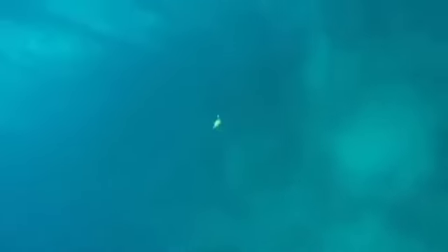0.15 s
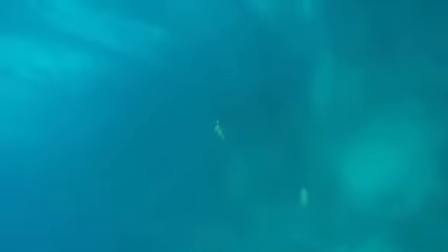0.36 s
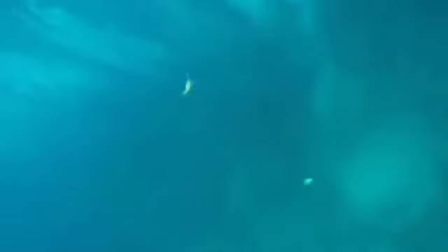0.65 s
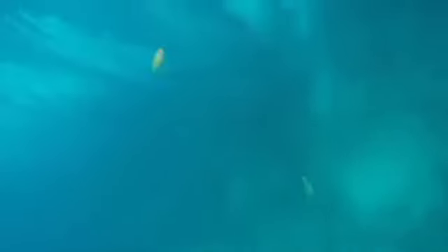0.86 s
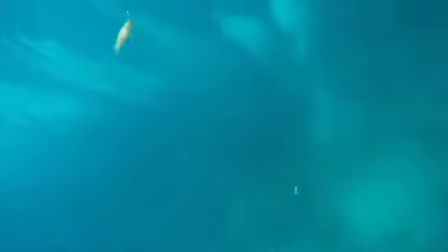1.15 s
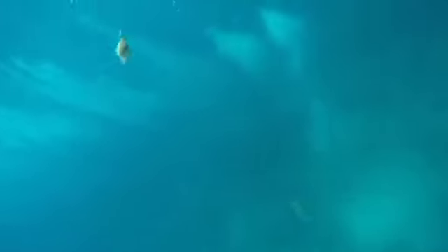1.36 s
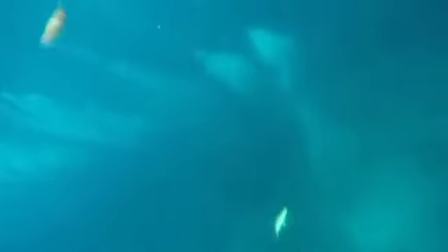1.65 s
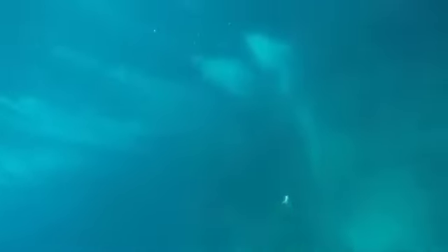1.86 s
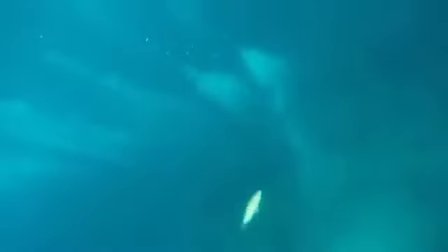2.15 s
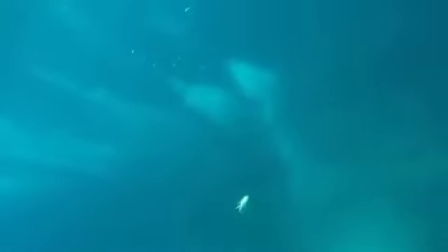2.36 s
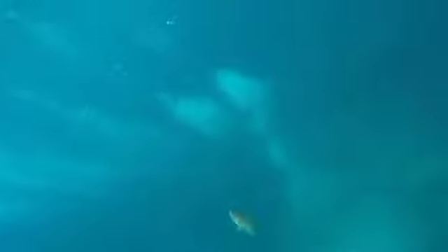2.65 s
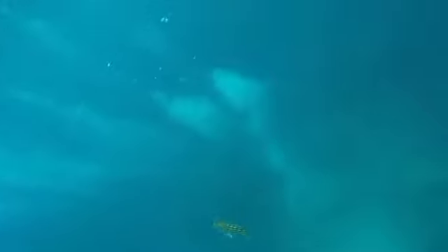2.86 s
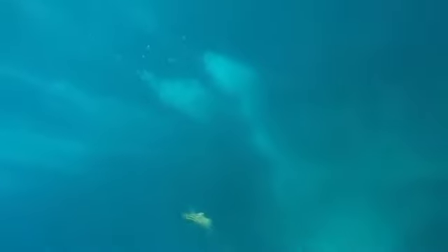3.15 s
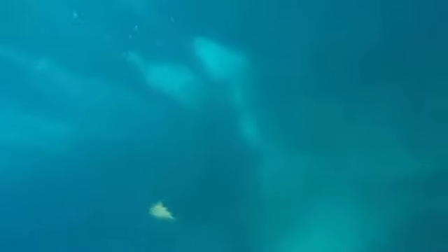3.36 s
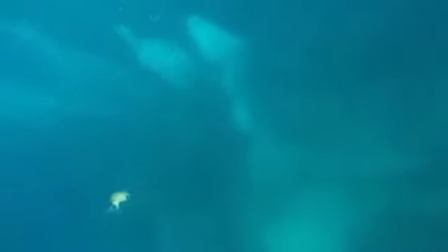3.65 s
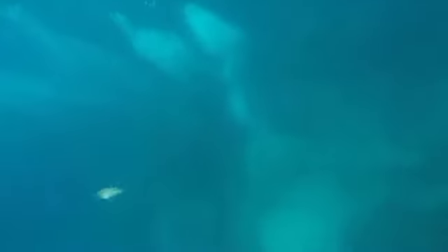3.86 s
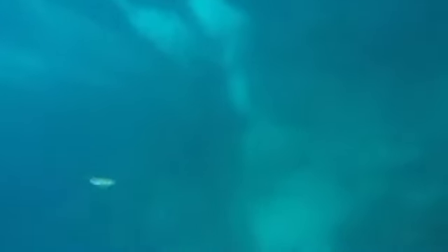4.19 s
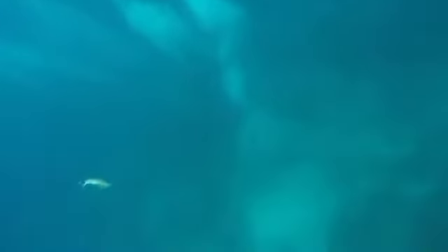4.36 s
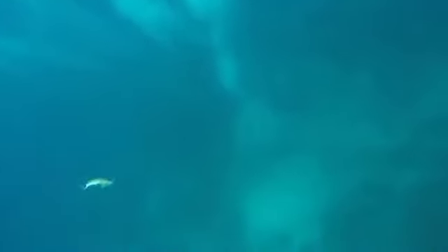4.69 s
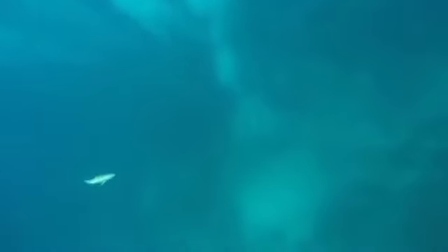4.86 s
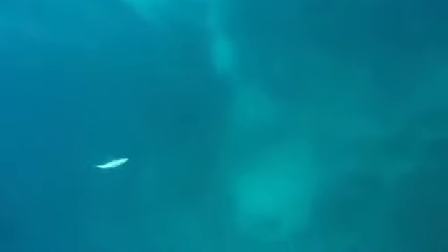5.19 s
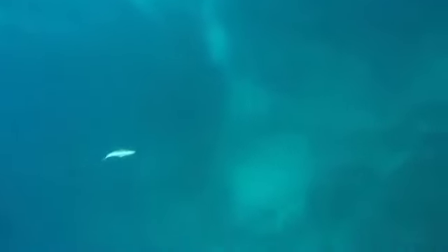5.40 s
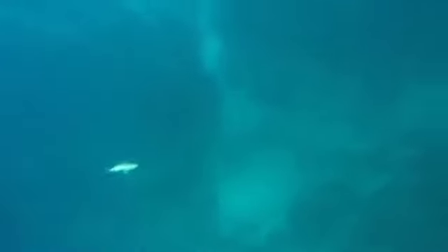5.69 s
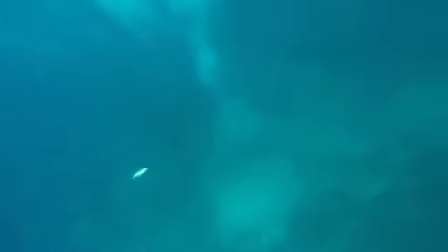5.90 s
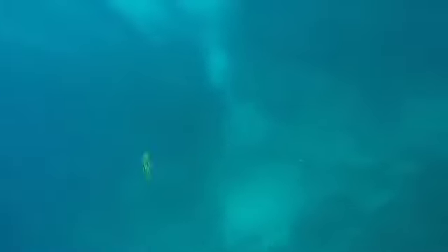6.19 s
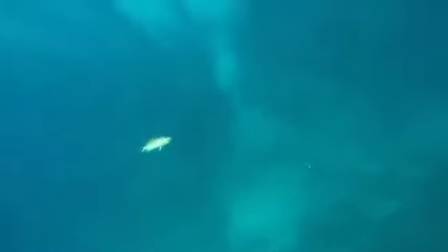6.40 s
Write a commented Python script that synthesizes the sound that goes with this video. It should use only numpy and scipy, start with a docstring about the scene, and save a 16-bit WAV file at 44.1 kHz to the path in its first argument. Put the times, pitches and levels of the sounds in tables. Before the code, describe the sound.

A slow boat engine idles, heard underwater. Each firing is a hollow, ringing knock through the hull, followed by a quick metallic clatter, about six or seven times a second. In the second half it slows and sounds heavier, stumbling once near the end. Water rumbles low against the microphone throughout, with a bubble blip early on and faint snapping of shrimp all around.

```python
"""Boat engine under water

A slow single-cylinder engine idles, then sags towards the end. Each firing booms through
the hull, and the valve gear clacks at fixed points of the cycle. Water rumbles against
the camera housing, a few bubbles ring, and shrimp snap all around."""
import sys
import numpy as np
from scipy import signal
from scipy.fft import rfft, irfft
from scipy.io import wavfile
from scipy.ndimage import uniform_filter1d

SR = 44100
rng = np.random.default_rng(int(sys.argv[2]) if len(sys.argv) > 2 else 0)


def unload_wav(signal):
    """Save mono or channel-first audio to the path in sys.argv[1] as 16-bit WAV at rate SR, clipped to [-1, 1]."""
    wavfile.write(
        sys.argv[1],
        SR,
        np.round(np.clip(np.atleast_2d(signal).T, -1, 1) * 32767).astype(np.int16),
    )


N = 288414


def amp(db):
    """Turns decibels into a number to multiply by."""
    return 10 ** (np.asarray(db) / 20)


def unit_level(x):
    """Scales a sound to an average power of 1."""
    return x / np.sqrt(np.mean(x ** 2) + 1e-20)


def at_time(curve, s):
    """Reads a curve at s seconds."""
    return np.interp(s, *np.transpose(curve))


def at_hz(points, hz):
    """Reads a spectrum between its points, with octaves evenly spaced."""
    point_hz, db = np.transpose(points)
    return np.interp(np.log(hz + 1), np.log(point_hz + 1), db)


def add(mix, s, sound):
    """Mixes a sound in at s seconds."""
    start = round(s * SR)
    sound = sound[max(-start, 0):]
    part = mix[max(start, 0):][:len(sound)]
    part += sound[:len(part)]


def filter_hz(size=8192):
    """The frequencies at which filters are drawn."""
    return np.fft.rfftfreq(size, 1 / SR)


def peaks_db(rows, hz):
    """Adds up peaks and dips into one curve in dB."""
    return sum(db / (1 + (2 * (hz - centre) / width) ** 2) for centre, width, db in rows)


def make_filter(db):
    """A filter with these gains that rings only after a blow, never before."""
    log_gain = np.log(amp(np.r_[db, db[-2:0:-1]]))
    spectrum = np.exp(np.conj(signal.hilbert(log_gain)))
    return np.fft.ifft(spectrum).real[:len(db)]


def ring(hz, swell_s, order=1):
    """A tone that swells to height 1 and dies away; a higher order makes it shorter."""
    t = np.arange(SR // 4) / SR
    envelope = (t / swell_s * np.exp(1 - t / swell_s)) ** order
    return envelope * np.sin(2 * np.pi * hz * t)


def rattle(decay_s):
    """A dying burst of tiny contacts, about equally strong at all frequencies."""
    t = np.arange(SR // 10) / SR
    spectrum = rfft(rng.standard_normal(len(t)) * np.exp(-t / decay_s))
    flat_burst = irfft(spectrum / abs(spectrum))
    return flat_burst * np.exp(-t / (10 * decay_s)) * np.sqrt(decay_s * SR / 2)


def noise(points):
    """Steady noise with the given spectrum."""
    gain = amp(at_hz(points, filter_hz(N)))
    return unit_level(irfft(rfft(rng.standard_normal(N)) * gain, N))


# The deep tone of swirling water. Each row: frequency in Hz, relative level in dB.
RUMBLE_SPECTRUM = [(8, -16.5), (18, 4), (32, 5.5), (48, -1), (65, -1.5), (88, -9), (120, -11), (160, -18),
                   (185, -23.5), (280, -22), (420, -24), (800, -30.5), (2000, -65.5)]
# The water's slow push on the housing. Each row: time in seconds, relative level in dB.
WATER_SWELL = [(0, -17.5), (.6, -15.5), (.95, -19.5), (1.45, -16), (1.85, -19), (2.35, -16), (3.2, -19.5),
               (3.65, -18), (5.15, -18.5), (6, -17), (6.5, -14)]

def water(db=-1.0):
    """Swirls of water press on the housing and make a rumble that slowly rises and falls."""
    eddies = noise(RUMBLE_SPECTRUM)
    eddies /= np.sqrt(uniform_filter1d(eddies ** 2, size=7000))  # even out chance swells
    swell_db = at_time(WATER_SWELL, np.arange(N) / SR)
    return amp(db + swell_db) * unit_level(eddies)


# Bubbles near the housing. Each row: start in seconds, pitch in Hz, level in dB, swell in seconds.
NEAR_BUBBLES = [(.827, 572, -9.5, 0.01), (3.922, 275, -23, .014), (5.207, 3700, -21, 0.00063)]

def bubbles():
    """Each bubble rings briefly at its own pitch."""
    out = np.zeros(N)
    for s, hz, db, swell_s in NEAR_BUBBLES:
        add(out, s, amp(db) * ring(hz, swell_s))
    return out


# The tone of a snap. Each row: frequency in Hz, gain in dB.
SNAP_SPECTRUM = [(500, -48), (1800, -34), (2600, 8.5), (4200, 4.5), (5500, 1.5), (8000, 1), (9500, -4),
                 (15000, -11.5)]

def snap(tilt_db, decay_s=0.0017):
    """A click smeared for a moment by the housing; a lower tilt makes it duller."""
    hz = filter_hz()
    treble_db = at_hz([(5500, 0), (11000, tilt_db + 8.0)], hz)
    tone = make_filter(at_hz(SNAP_SPECTRUM, hz) + treble_db)
    return signal.fftconvolve(rattle(decay_s), tone)[:SR // 20]


# The fizz of far shrimp. Each row: frequency in Hz, relative level in dB.
FIZZ_SPECTRUM = [(2000, -15), (4300, -4.5), (6500, 2.5), (8300, 1.5), (9500, -15), (11200, 2.5),
                 (13000, -15), (15500, -11.5)]
# Shrimp close by. Each row: start in seconds, relative level in dB, relative treble tilt in dB.
NEAR_SNAPS = [(0.1504, -27.5, -18), (0.7294, -25, -25), (0.8635, -29, -23), (0.885, -30, -16),
              (0.9694, -27.5, -36), (1.256, -26, -22), (3.528, -30, -19), (4.181, -29, -10),
              (4.3663, -31, -8), (5.2, -31, -14), (5.6176, -26.5, -17), (5.9243, -30.5, -7),
              (6.088, -30.5, -11), (6.3214, -31, -16), (6.3362, -29, -12)]

def shrimp(near_db=3, crowd_db=-55, snaps_per_s=230, spread_db=5.0, fizz_db=-61):
    """Shrimp make a far fizz, a few near snaps and a crowd of small ones at random times."""
    out = amp(fizz_db) * noise(FIZZ_SPECTRUM)
    for s, db, tilt_db in NEAR_SNAPS:
        add(out, s, amp(db + near_db) * snap(tilt_db))
    tilts = np.linspace(-14, 2, 20)
    for tilt_db in tilts:
        sizes = amp(crowd_db + spread_db * np.minimum(rng.exponential(1, N), 4))
        snapping = rng.random(N) < snaps_per_s / len(tilts) / SR
        out += signal.oaconvolve(sizes * snapping, snap(tilt_db))[:N]
    return out


# The way through hull and water. Each row: frequency in Hz, relative gain in dB.
WATER_PATH = [(60, -16.5), (200, -14.5), (400, -13.5), (690, -5.5), (820, -17.5), (1000, -19.5),
              (1700, -26.5), (2600, -22), (3500, -30), (4250, -31), (4700, -48), (8000, -56), (15000, -72)]
# The hull's peaks and dips. Each row: centre in Hz, width in Hz, gain in dB.
HULL_PEAKS = [(450, 160, 8.5), (497, 4.4, 3), (617, 129.5, 13.5), (1147, 16, 10), (1547, 100, 6.5),
              (1752, 63, 10), (1867, 160, -7.5), (2045, 107, 13), (2183, 163, 12.5), (3400, 57, 3),
              (3412, 82, 8)]
# Four frequencies in Hz that set a blow's tone: low, middle, one held at 0 dB, high.
TONE_HZ = (600, 1300, 2150, 3600)

def through_hull(force, low_db, mid_db, high_db):
    """A force takes its tone from the spot it strikes and from the ringing of the hull."""
    hz = filter_hz()
    hull_db = at_hz(WATER_PATH, hz) + peaks_db(HULL_PEAKS, hz)
    hull_db -= 10 * np.log10(np.mean(amp(hull_db) ** 2))  # change the tone, keep the power
    contact_db = at_hz(list(zip(TONE_HZ, (low_db, mid_db, 0, high_db))), hz)
    return signal.oaconvolve(force, make_filter(hull_db + contact_db))[:N]


def far_echoes(db=-33):
    """The engine's steady wash of far echoes fills the gaps between blows."""
    return amp(db) * through_hull(rng.standard_normal(N), low_db=5, mid_db=0, high_db=-1)


# The engine's speed. Each row: time in seconds, firings per second.
ENGINE_SPEED = [(0.0, 6.449), (1.03, 6.604), (1.73, 6.901), (2.19, 6.94), (3.41, 6.715), (4.63, 6.275),
                (5.97, 5.503), (6.1, 5.208), (6.54, 5.185)]
# A near miss, then two hard firings. Each row: rough time in seconds, effort in dB.
ODD_FIRINGS = [(6.03, -4), (6.22, 5.5), (6.41, 3)]

def firings(first_s=.0164, uneven_db=.5):
    """One firing a cycle. Each row: start in seconds, cycle length in seconds, effort in dB."""
    t = np.arange(N + SR // 2) / SR
    cycles = np.cumsum(at_time(ENGINE_SPEED, t)) / SR
    cycles -= np.interp(first_s, t, cycles)
    times = np.interp(np.arange(int(cycles[-1])), cycles, t)  # when each cycle begins
    starts = times[times < N / SR]
    effort_db = uneven_db * rng.standard_normal(len(starts))
    for s, db in ODD_FIRINGS:
        effort_db[np.argmin(abs(starts - s))] = db
    return np.c_[starts, np.diff(times)[:len(starts)], effort_db]


KNOCK_FOLLOWS = .25  # share of a firing's effort that its metallic knock follows
# The metal blows of one cycle. Each row: place in the cycle from 0 to 1, level in dB,
# decay in seconds, then low, middle and high tone in dB.
METAL_BLOWS = [ (.001, -1.5, 0.0019, -3.5, -25.5, 1), (0.012, -10.5, 0.0029, -2.5, 8, -5.5),
               (0.041, -10.5, 0.0042, -10.5, 5.5, 2.5), (.092, -12, 0.0084, -1.5, -8, -3),
               (.254, -11, 0.0067, -4.5, -0.5, -4), (0.361, -26, 0.0064, 1.5, -1, -3),
               (.426, -10, 0.0082, -7.5, -9.5, -11.5), (.517, -18, 0.0085, -4.5, 1.5, 4.5),
               (.548, -14.5, .018, -6, 3.5, -15), (.707, -14, 0.012, -7.5, -8.5, -4),
               (0.819, -30, 0.0039, 1.5, 12.5, 11), (.955, -20.5, 0.0045, 7.5, 8.5, 0.5)]
# The valve gear fades a little as the camera drifts away. Each row: time in seconds, gain in dB.
VALVE_FADE = [(0, 0.45), (2, 0.5), (4, -1), (6.5, -1)]

def clatter(strokes, alike=.72, scatter_db=2.0, stray_s=.0003):
    """Piston and valve gear strike in short rattles, much the same from cycle to cycle."""
    out = np.zeros(N)
    for place, db, decay_s, *tone in METAL_BLOWS:
        force, usual = np.zeros(N), rattle(decay_s)
        for s, cycle_s, effort_db in strokes:
            blow = alike * usual + np.sqrt(1 - alike ** 2) * rattle(decay_s)
            late, loud = rng.standard_normal(2)
            due_s = s + place * cycle_s
            if place < .1:  # the knock of burning fuel grows with the firing's effort
                add(force, due_s, amp(db + KNOCK_FOLLOWS * effort_db) * blow)
            else:  # the valve gear is a little loose, so its time and level wander
                level_db = db + at_time(VALVE_FADE, s) + scatter_db * loud
                add(force, due_s + stray_s * late, amp(level_db) * blow)
        out += through_hull(force, *tone)
    return out


def ignition(strokes, db=-32.0):
    """The sudden rise of pressure puts a crisp edge on each knock."""
    out = np.zeros(N)
    for s, _, effort_db in strokes:
        add(out, s, amp(db + KNOCK_FOLLOWS * effort_db) * snap(tilt_db=-27))
    return out


# The main boom slowly fades. Each row: time in seconds, base level in dB.
BOOM_FADE = [(0, -12.5), (1.3, -13.5), (2.8, -14), (4.4, -18.5), (5.8, -19)]
# Its pitch sinks, then partly recovers. Each row: time in seconds, base pitch in Hz.
BOOM_HZ = [(0, 617), (3.5, 622), (4.7, 580), (6.2, 610)]
# The surges of one boom. Each row: delay in seconds, pitch multiplier, gain in dB, swell in seconds.
BOOM_SURGES = [(.0003, 1.01, 6, .0046), (.0068, .98, 1.5, .0046), (.0152, 1.0, -1, .005)]
# The strokes grow heavy as the engine labours. Each row: time in seconds, load in dB.
ENGINE_LOAD = [(0, 1), (3.9, 0.5), (5.5, 6.5)]
# After each firing, lower tones follow in a falling glide over a deep thump. Each row: delay in
# seconds, pitch in Hz, base level in dB, swell in seconds, dB gained for each dB of load.
LOW_RINGS = [(0.015, 41.7, -15.5, 0.016, 0.2), (0.0345, 113, -20.5, 0.0063, 0.48),
             (0.0034, 215.4, -30, .011, 0.43), (0.023, 300, -36.5, 0.003, 1.36),
             (0.00779, 423.4, -26.5, 0.0061, 1.04)]

def booms(strokes, scatter_db=.8, stray_s=.00015):
    """Each firing rings the hull's main note in three surges, and lower tones follow."""
    out = np.zeros(N)
    for s, _, effort_db in strokes:
        boom_db = at_time(BOOM_FADE, s) + effort_db
        boom_hz = at_time(BOOM_HZ, s)
        for k, (delay_s, factor, surge_db, swell_s) in enumerate(BOOM_SURGES):
            late, loud = rng.standard_normal(2) * min(k, 1)  # the first surge does not wander
            surge = ring(boom_hz * factor, swell_s, order=2)
            add(out, s + delay_s + stray_s * late, amp(boom_db + surge_db + scatter_db * loud) * surge)
        load_db = at_time(ENGINE_LOAD, s) + effort_db
        for delay_s, low_hz, low_db, swell_s, follows in LOW_RINGS:
            late, loud = rng.standard_normal(2)
            level_db = low_db + follows * load_db + scatter_db * loud
            add(out, s + delay_s + stray_s * late, amp(level_db) * ring(low_hz, swell_s))
    return out


def scene():
    """Engine, water, bubbles and shrimp, heard at one point."""
    strokes = firings()
    engine = booms(strokes) + ignition(strokes) + clatter(strokes) + far_echoes()
    return (engine + water() + bubbles() + shrimp())[None]


# Bands that the housing holds back. Each row: centre in Hz, width in Hz, gain in dB.
HOUSING_DIPS = [(4670, 79, -7), (5920, 86, -15), (7070, 150, -8), (10200, 790, -1.5)]

def record(dry):
    """The housing weakens a few narrow bands, and the highest treble is cut off."""
    eased = dry * signal.windows.tukey(N, .001)  # a tiny fade at both ends
    housing = make_filter(peaks_db(HOUSING_DIPS, filter_hz()))
    inside = signal.oaconvolve(eased, housing[None])[:, :N]
    treble_cut = signal.firwin(411, cutoff=15500, window=("kaiser", 8), fs=SR)
    return signal.oaconvolve(inside, treble_cut[None], "same")


dry = scene()
out = record(dry)
unload_wav(out)
```